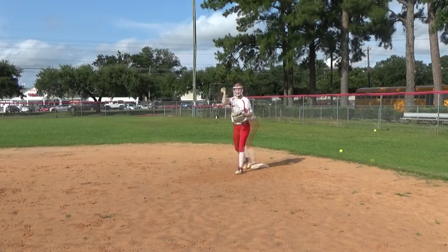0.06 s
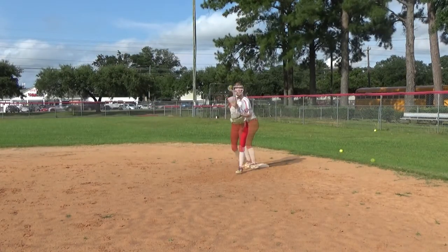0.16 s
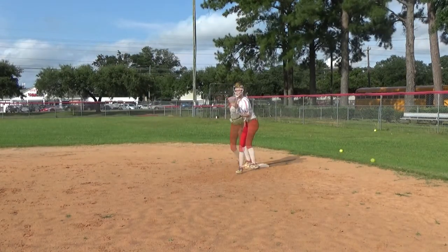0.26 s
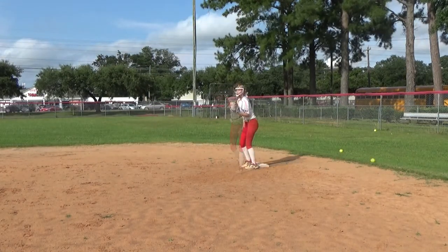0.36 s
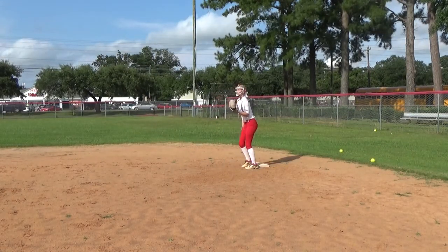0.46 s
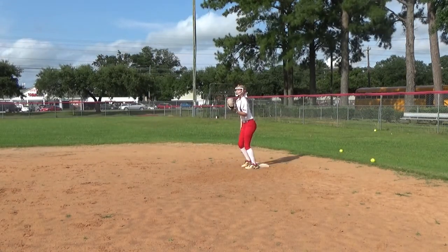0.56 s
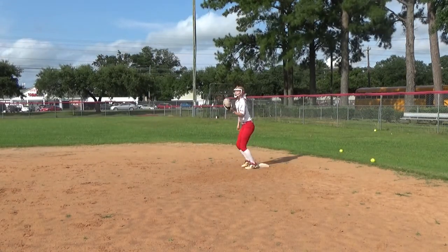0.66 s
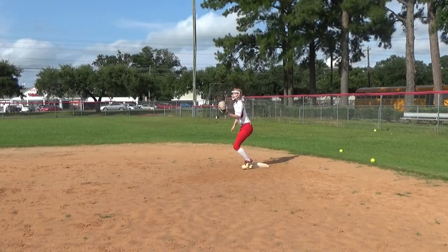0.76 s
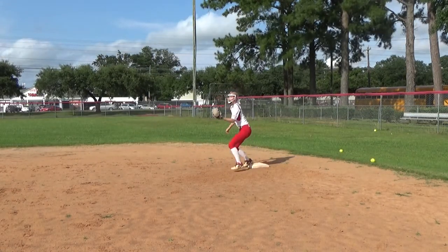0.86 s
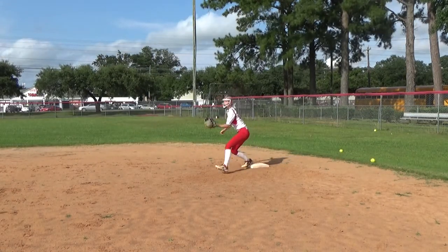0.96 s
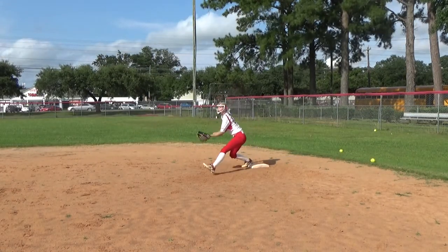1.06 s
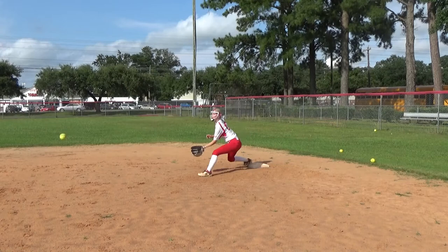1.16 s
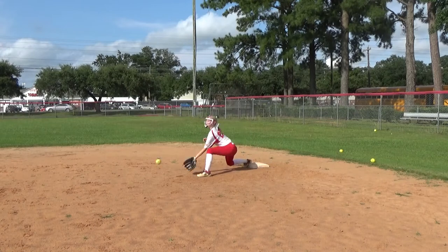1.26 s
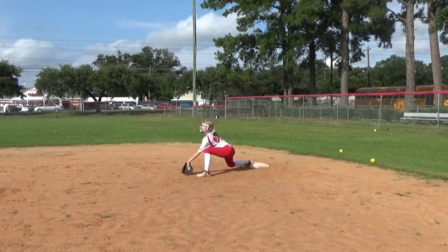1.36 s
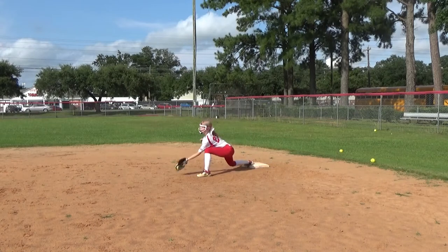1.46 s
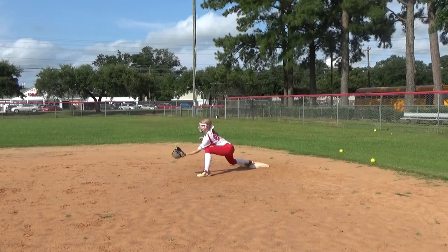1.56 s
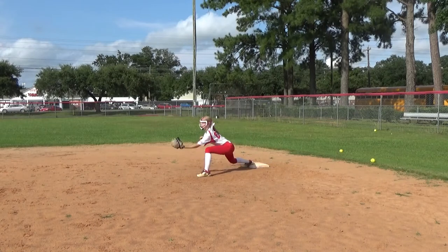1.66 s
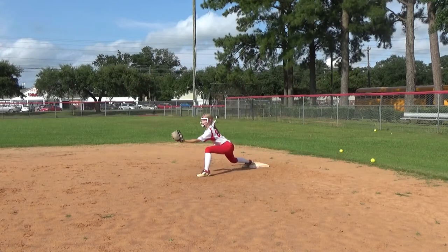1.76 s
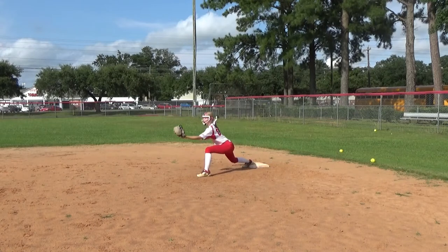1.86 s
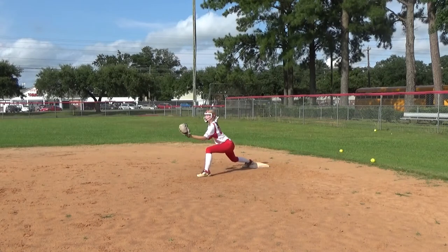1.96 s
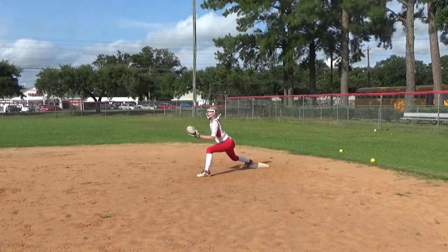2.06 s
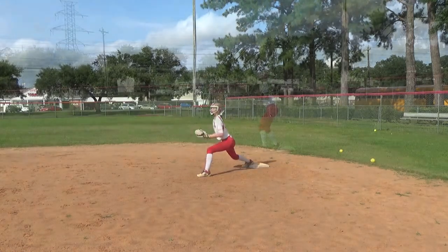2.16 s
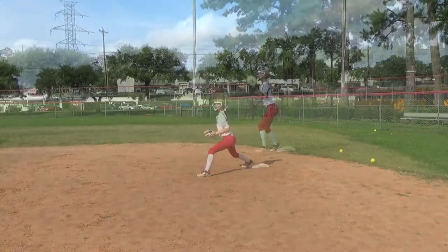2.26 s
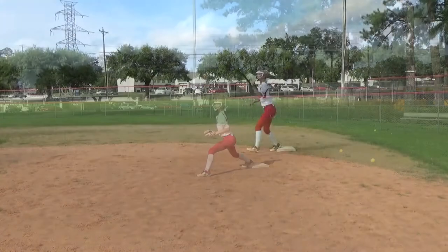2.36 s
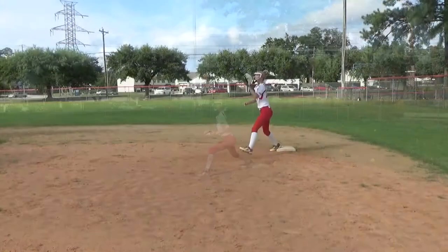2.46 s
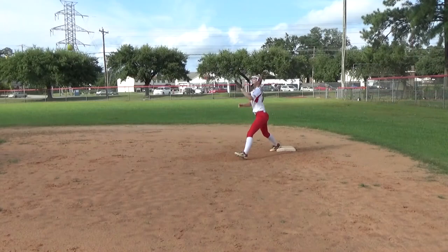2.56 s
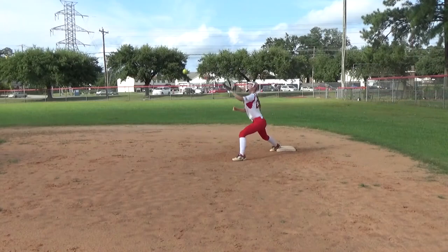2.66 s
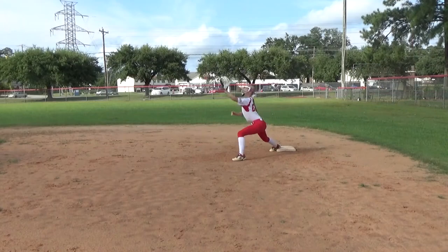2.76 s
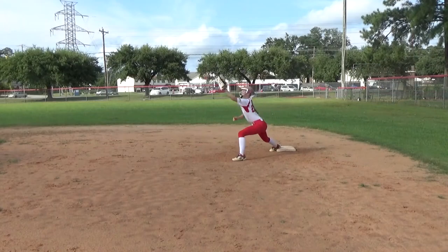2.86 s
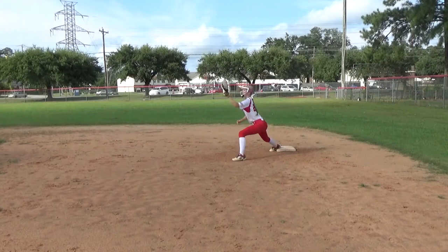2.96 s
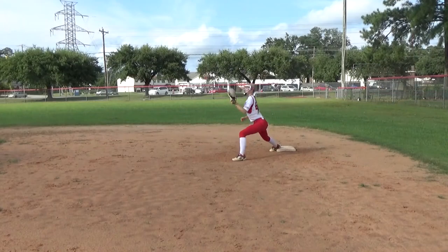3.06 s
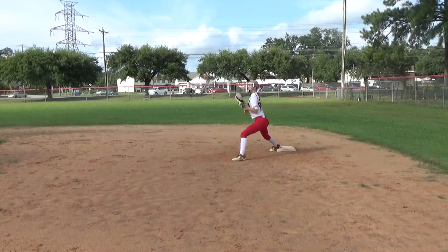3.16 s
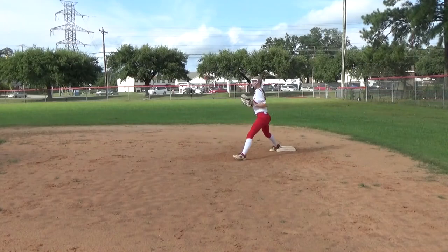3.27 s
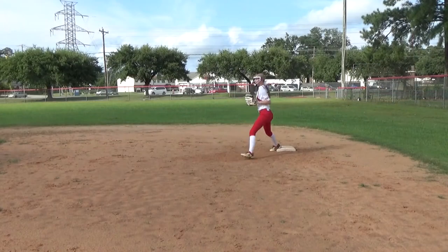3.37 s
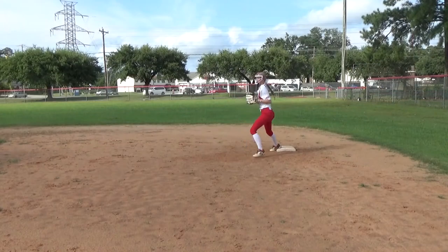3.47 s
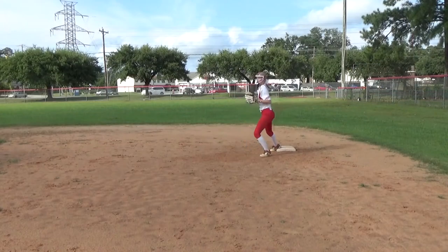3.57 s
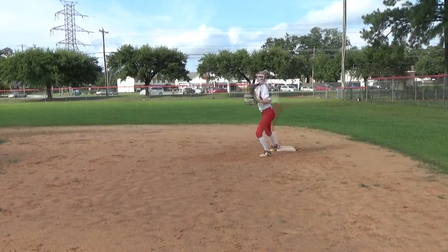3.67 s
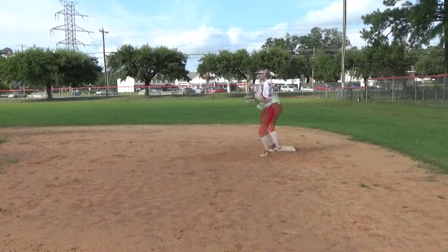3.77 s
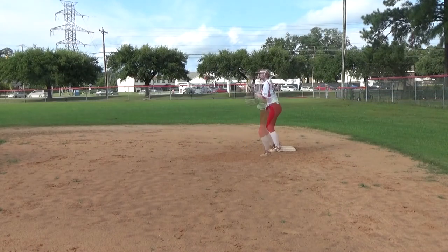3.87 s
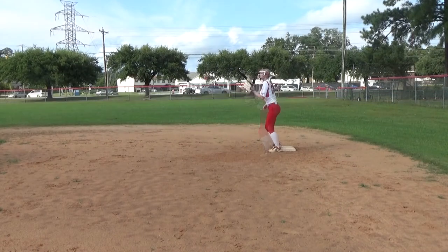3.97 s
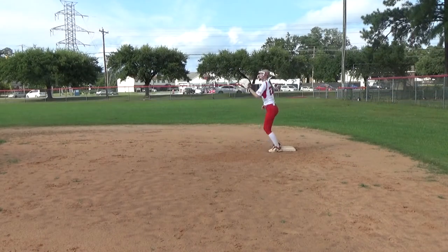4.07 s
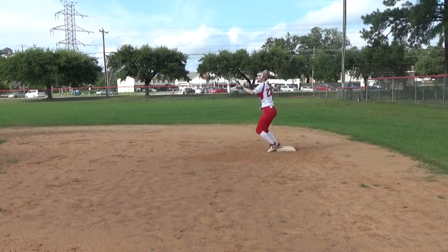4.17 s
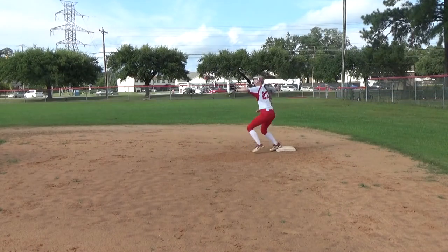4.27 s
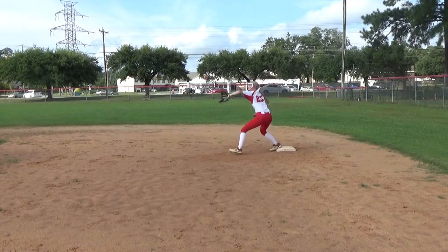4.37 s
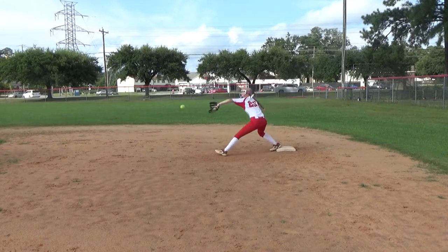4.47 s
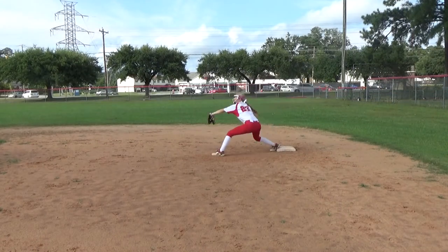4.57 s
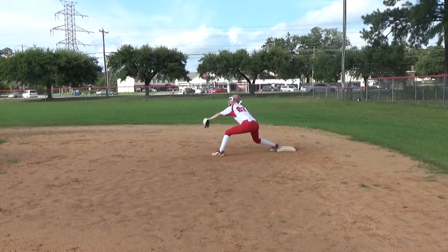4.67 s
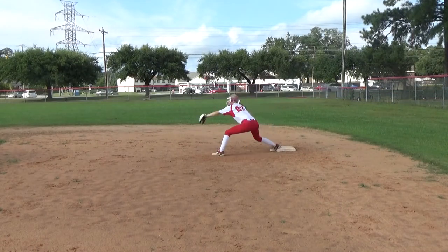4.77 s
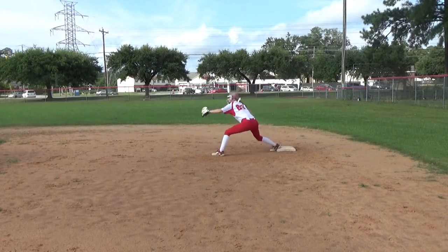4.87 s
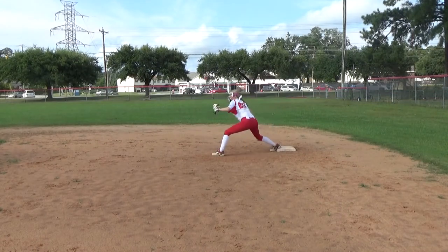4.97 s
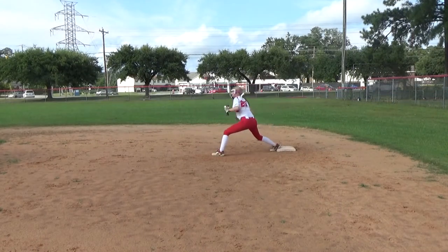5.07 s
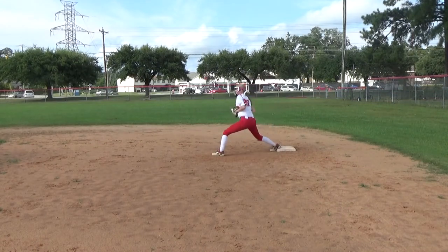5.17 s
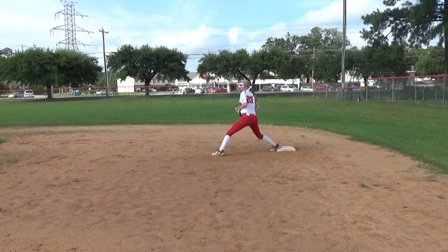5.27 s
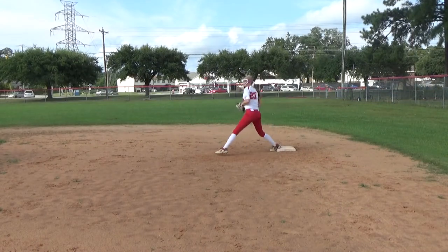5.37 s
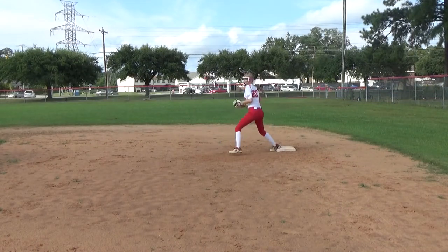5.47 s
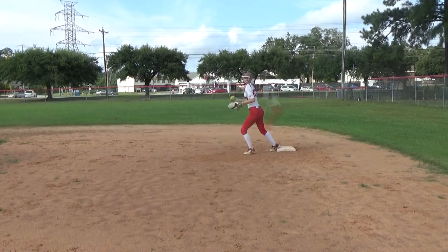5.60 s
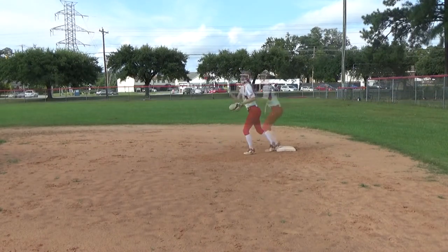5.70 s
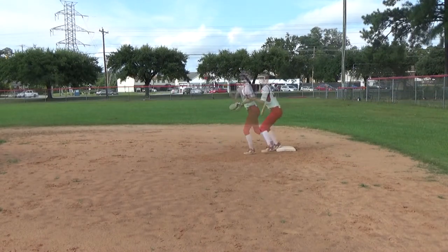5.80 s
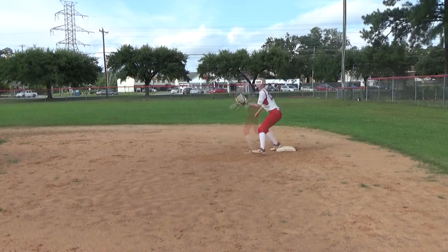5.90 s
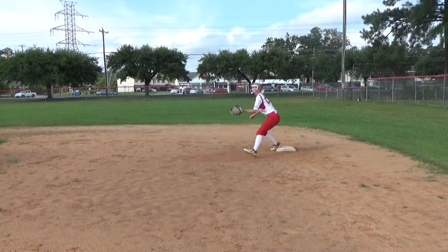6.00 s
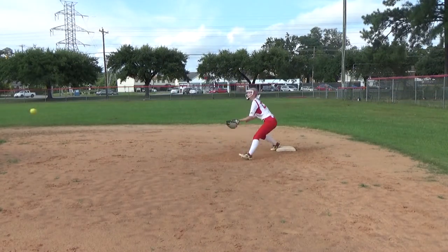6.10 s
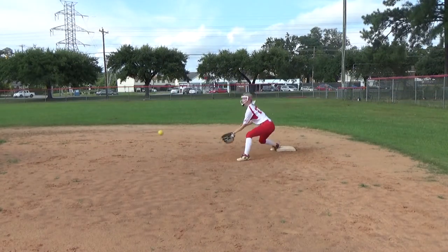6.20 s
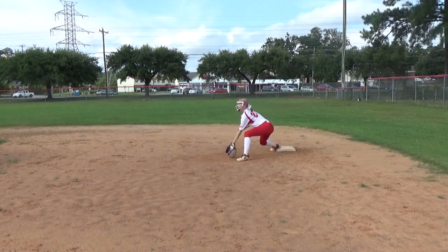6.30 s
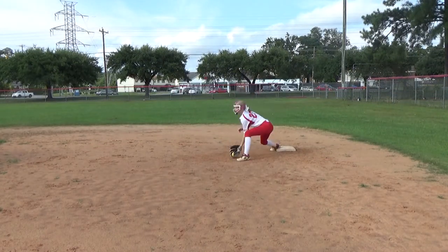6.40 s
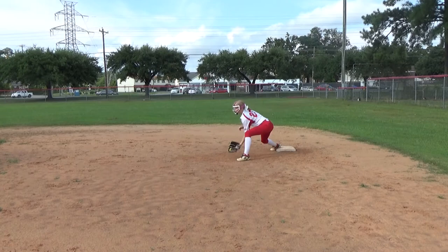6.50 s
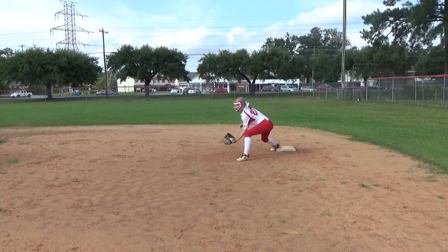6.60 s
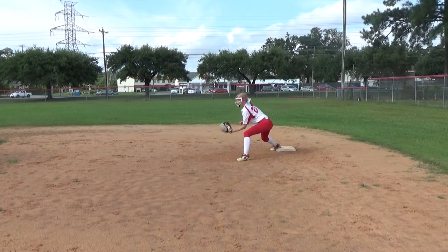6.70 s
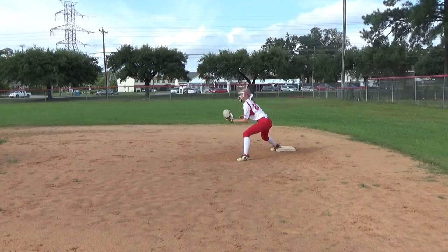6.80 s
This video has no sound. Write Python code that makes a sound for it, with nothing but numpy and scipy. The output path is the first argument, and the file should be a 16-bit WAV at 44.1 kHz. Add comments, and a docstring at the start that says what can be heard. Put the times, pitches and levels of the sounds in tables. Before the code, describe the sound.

A softball pops into a leather glove four times on an open dirt infield, at about 1.4, 2.8, 4.6 and 6.4 seconds. Each catch is a sharp slap with a short echo, just right of centre; the first is a little lighter and the third is a tighter, higher knock. Cleats tap, twist and skid on grit around the catches, with further steps near 3.5 and 5.7 seconds.

Low, lumpy wind gusts buffet the microphone from 0.3 to 3.9 seconds, fall away, then return more gently from about 5.5 seconds. A distant traffic hum continues underneath, with a faint low drone swelling near 2.3 and 5.6 seconds. Insects hiss thinly throughout, a quiet cricket trills from about 3 seconds, and a brighter insect buzz joins at 5.8 seconds. The sound drops out for an instant near 2.4 and 3.9 seconds.

```python
"""Four throws pop into a leather glove in a fielding drill on a dirt infield, each with a short echo.
The ball rings the damped pocket and slaps out a crack; cleats knock and scuff the grit around each catch.
Gusts buffet the microphone over a distant town hum and a low drone, while a cricket and other insects
sing in the grass with their wings. The sound drops out briefly twice."""
import sys
import numpy as np
from scipy import signal
from scipy.fft import rfft, irfft
from scipy.io import wavfile
from scipy.ndimage import uniform_filter1d

SR = 44100
rng = np.random.default_rng(int(sys.argv[2]) if len(sys.argv) > 2 else 0)


def file_out(sig):
    """Save sig as 16-bit WAV at sys.argv[1]."""
    # one column per channel
    cols = np.atleast_2d(sig).T
    # limit, then scale
    lim = np.clip(cols, -1, 1)
    pcm = np.round(lim * 32767).astype(np.int16)
    wavfile.write(sys.argv[1], SR, pcm)


N = 301718
TIME = np.arange(N) / SR

# Stereo image of the background. Each row: frequency in Hz, left-right likeness (capped in noise_pair).
AMBIENT_LIKENESS = [(60, 0.94), (300, 1), (1400, 0.74), (7000, 0.7), (13000, 1)]


def amp(db):
    """Decibels to gain."""
    return 10 ** (np.asarray(db) / 20)


def unit(x):
    """Scales to rms 1."""
    return x / np.sqrt(np.mean(x ** 2) + 1e-20)


def decay(t, t60_s):
    """Exponential fall, 60 dB in t60_s."""
    return np.exp(-np.log(1000) * t / t60_s)


def read(points, hz):
    """Reads a spectrum table on a log-frequency axis."""
    f, value = np.transpose(points)
    return np.interp(np.log(hz + 1), np.log(f + 1), value)


def follow(rows):
    """Reads a time curve at every sample."""
    return np.interp(TIME, *np.transpose(rows))


def add(mix, start_s, sound):
    """Mixes a sound in at start_s."""
    part = mix[round(start_s * SR):][:len(sound)]
    part += sound[:len(part)]


def wander(rate_hz):
    """Random motion of rms 1, up to about rate_hz."""
    hz = np.fft.rfftfreq(N, 1 / SR)
    return unit(irfft(rfft(rng.standard_normal(N)) / (1 + (hz / rate_hz) ** 4), N))


def colour(x, points, tilt_db_oct, size=1024):
    """Minimum-phase filter of unit energy with the given spectrum and treble tilt."""
    hz = abs(np.fft.fftfreq(size, 1 / SR))
    log_gain = np.log(amp(read(points, hz) + tilt_db_oct * np.log2(np.maximum(hz, SR / 64) / SR)))
    taps = np.fft.ifft(np.exp(np.conj(signal.hilbert(log_gain)))).real
    return signal.fftconvolve(x, taps / np.linalg.norm(taps))


def noise_pair(points, likeness=AMBIENT_LIKENESS):
    """Two partly alike channels of coloured noise, mid rms 1."""
    hz = np.fft.rfftfreq(N, 1 / SR)
    same = np.clip(read(likeness, hz), -0.9, 0.9)
    mid, side = rfft(rng.standard_normal((2, N))) * amp(read(points, hz))
    mid = irfft(mid, N)
    side = irfft(side * np.sqrt((1 - same) / (1 + same)), N)
    return np.array([mid + side, mid - side]) / mid.std()


def town(hum_gain_db=2, swell_db=0.5):
    """Far traffic and leaves under the thin high hiss of the verge."""
    # Spectra. Each row: frequency in Hz, relative level in dB.
    hum_spectrum = [(15, -64), (25, -45), (76, -1.5), (160, -1), (211, -13), (267, -4.5), (377, -5),
                    (793, 2.5), (1020, 1), (1120, 1), (1830, -2), (6400, -16.5), (8320, -24), (14100, -120)]
    hiss_spectrum = [(4500, -1), (6200, 0), (7800, 3.5), (8800, 0.5), (10500, 1.5), (12500, -6.5),
                     (16000, -11.5)]
    # Level curves. Each row: time in seconds, level in dB before gains.
    hum_levels = [(0, -46.5), (.48, -43.5), (1.39, -42.5), (2.4, -45.5), (2.7, -50.5), (3.7, -47),
                  (5.2, -47.5), (6.2, -50.5), (6.84, -48)]
    hiss_levels = [(0, -56.5), (1.2, -53.5), (1.8, -54), (2.5, -56.5), (4.3, -56.5), (5.4, -59.5),
                   (6.0, -57), (6.84, -54)]
    hum = noise_pair(hum_spectrum) * amp(follow(hum_levels) + hum_gain_db + swell_db * wander(14))
    return hum + noise_pair(hiss_spectrum) * amp(follow(hiss_levels))


def drone():
    """A far, narrow band of low noise swells and fades."""
    # Swell. Each row: time in seconds, level in dB.
    levels = [(0, -56.5), (1.9, -52), (2.32, -45), (2.6, -66), (4.4, -61.5), (4.7, -53.5), (5.3, -58),
              (5.65, -41.5), (5.87, -58), (6.84, -51)]
    band_hz_db = [(90, -17), (165, -5.5), (205, 3), (250, -6), (380, -45), (900, -90)]
    return noise_pair(band_hz_db) * amp(follow(levels))


def insects(waver_db=1.7, rate_jitter=0.063, fade_s=0.0063):
    """Each song is a narrow wing resonance, pulsed by the wing strokes."""
    # Each row: start and end in seconds, centre and width in Hz, level in dB, strokes per second,
    # stroke depth from 0 to 1.
    songs = [(0, 7, 7300, 235, -58.5, 36, 0.4), (0, 7, 6900, 360, -60.5, 16, 0.2),
             (.42, .82, 9100, 130, -65, 30, .2), (5.83, 7, 10100, 660, -53.5, 70, 0),
             (5.83, 7, 9570, 620, -57.5, 70, .15), (5.83, 7, 5160, 894, -60, 82, 0.1)]
    out = np.zeros((2, N))
    for start_s, end_s, hz, width_hz, db, stroke_hz, depth in songs:
        band = [(hz - 3 * width_hz, -70), (hz - width_hz, -13), (hz - width_hz / 3, 0),
                (hz + width_hz / 3, 0), (hz + width_hz, -17), (hz + 2 * width_hz, -70)]
        turns = np.cumsum(stroke_hz * (1 + rate_jitter * wander(5.3))) / SR
        strokes = unit(1 + depth * np.cos(2 * np.pi * turns))
        gate = np.clip(np.minimum(TIME - start_s, end_s - TIME) / fade_s, 0, 1)
        out += noise_pair(band) * strokes * amp(db + waver_db * wander(24)) * gate
    return out


def cricket(centre_hz=2760, stroke_hz=29.9, sag_hz=160, scatter_hz=70, waver_db=1.5):
    """One short note per wing stroke, sagging in pitch as the wing slows; the grass blurs it."""
    # Trill. Each row: time in seconds, level in dB.
    levels = [(0, -70), (1.5, -75), (2.5, -72), (3.1, -60), (4.3, -60), (4.95, -59), (5.4, -62),
              (5.9, -61.5), (6.84, -60)]
    stroke = (TIME * stroke_hz) % 1
    envelope = np.sin(np.pi * stroke) ** 4
    pitch_hz = centre_hz - sag_hz * (stroke - 0.5) + scatter_hz * wander(128)
    tone = np.sin(2 * np.pi * np.cumsum(pitch_hz) / SR)
    return unit(envelope * tone) * amp(follow(levels) + waver_db * wander(16))


def gusts(rise_s=0.017, fall_s=0.045, sag_db_per_s=8):
    """Wind level and brightness in dB: each gust rises fast, sags and drops back into the breeze."""
    # Breeze between gusts. Each row: time in seconds, level in dB.
    breeze = [(0, -63.5), (1.5, -52.5), (2.2, -48), (3.0, -45), (3.8, -46), (3.9, -74), (5.2, -59),
              (6.0, -49.5), (6.84, -44.5)]
    # Gusts. Each row: start and length in seconds, level and brightness in dB.
    bursts = [(0.289, 0.18, -30, 2), (0.452, .2, -34, 0), (0.631, 0.38, -28.5, 1.5),
              (1.002, 0.54, -35.5, -2.5), (1.138, 0.075, -30, 1.5), (1.847, 0.1, -33, -1),
              (1.922, .22, -39.5, -1), (2.023, 0.054, -31.5, -3), (2.278, 0.34, -37.5, -2.5),
              (2.452, 0.22, -29.5, 2), (2.569, .07, -27, 2.5), (2.652, 0.18, -30, 0.5),
              (2.959, 0.16, -34.5, 0), (3.232, 0.352, -33, -1.5), (3.611, 0.22, -38.5, -1),
              (3.774, 0.12, -32, 0), (5.244, 0.47, -53, -7), (5.545, 0.075, -37.5, -5),
              (5.6, 0.2, -36.5, -3), (6.143, .27, -39.5, -0.5), (6.446, 0.35, -37, 0.5)]
    power, weighted_bright = amp(follow(breeze)) ** 2, np.zeros(N)
    for start_s, length_s, db, bright_db in bursts:
        t = np.arange(0, length_s, 1 / SR)
        shape = np.minimum(t / rise_s, 1) * np.minimum((length_s - t) / fall_s, 1)
        gust_power = (shape * amp(db - sag_db_per_s * t)) ** 2
        add(power, start_s, gust_power)
        add(weighted_bright, start_s, gust_power * bright_db)
    return 10 * np.log10(power), weighted_bright / power


def wind(lump_db=2, lump_hz=32, split_hz=280, strong_db=-33, tilt_per_db=0.25, likeness=0.9):
    """Eddies hit the microphone in lumps; stronger gusts move their weight up in pitch."""
    # Buffeting. Each row: frequency in Hz, relative level in dB.
    spectrum = [(25, -40), (60, -17.5), (110, -6.5), (200, 0), (330, 1), (480, -3.5), (700, -7.5),
                (1000, -16.5), (2000, -31.5), (4500, -47), (9000, -61), (16000, -81)]
    # The air reaches the left port first. Each row: frequency in Hz, phase lead in radians.
    port_lead = [(20, .3), (60, 0.32), (120, 0.49), (220, 0.96), (420, 1.27), (800, 1.82), (1500, 1.04),
                 (4000, 1.3)]
    level_db, bright_db = gusts()
    level_db += lump_db * wander(lump_hz)
    lead_rad = read(port_lead, np.fft.rfftfreq(N, 1 / SR))
    air = noise_pair(spectrum, [(1, likeness)])
    air = irfft(rfft(air) * np.exp(0.5j * np.array([lead_rad, -lead_rad])), N)
    air /= air.mean(0).std()
    low = signal.sosfiltfilt(signal.butter(2, split_hz, fs=SR, output="sos"), air)
    tilt_db = tilt_per_db * np.clip(level_db - strong_db, -18, 4) + bright_db
    return amp(level_db) * (low * amp(-tilt_db) + (air - low) * amp(tilt_db))


def field(x, near_db=-15, near_t60_s=0.019, far_db=-21, far_t60_s=0.92, echoes_per_s=2000):
    """The ground scatters a little at once; fence and trees return a faint, dull tail."""
    t = np.arange(SR) / SR
    near, mid, side = rng.standard_normal((3, SR)) * (rng.random((3, SR)) < echoes_per_s / SR)
    near = signal.lfilter(*signal.butter(1, 4000, fs=SR), near * decay(t, near_t60_s))
    far = np.array([mid + side / 2, mid - side / 2]) * decay(t, far_t60_s) * np.minimum(t / 0.014, 1)
    far = signal.lfilter(*signal.butter(2, 2200, fs=SR), far)
    taps = amp(near_db) * np.array([near, -near]) / np.linalg.norm(near)
    taps += amp(far_db) * far / np.linalg.norm(far[0])
    return x + signal.fftconvolve(x[None], taps, axes=1)[:, :N]


def sliding_sole(strokes, peak_at, grains_per_s=15000, spread_db=5):
    """A sole crushes a stream of sand grains, pressing hardest at the share peak_at of each stroke."""
    # Grit. Each row: frequency in Hz, relative level in dB.
    spectrum = [(150, -12), (500, -1), (1000, -1), (1700, 3), (3000, -5), (4500, -7), (7000, -9),
                (8500, -11), (10500, -11), (13000, -20), (16000, -30)]
    out = np.zeros(N)
    sizes = amp(spread_db * np.minimum(rng.exponential(1, N), 5)) * rng.choice([-1., 1.], N)
    grains = unit(sizes * (rng.random(N) < grains_per_s / SR))
    for start_s, length_s, db, tilt_db_oct in strokes:
        stroke = grains[round(start_s * SR):][:round(length_s * SR)]
        pressure = np.interp(np.linspace(0, 1, len(stroke)), [0, peak_at, 1], [0, 1, 0]) ** 0.64
        add(out, start_s, amp(db) * colour(stroke * pressure, spectrum, tilt_db_oct))
    return out


def scuffs():
    """Soles twist or drag on grit; the lunging foot skids to rest after a catch."""
    # Each row: start and length in seconds, level in dB, treble tilt in dB per octave.
    twists = [(1.243, .047, -29.5, -2.5), (1.289, 0.069, -33, -1.5), (1.64, 0.029, -36, -2.5),
              (2.205, .058, -46.5, 2.5), (2.702, 0.039, -26, -1), (2.733, .038, -29, 1.5),
              (2.776, 0.045, -40.5, 2), (3.422, .05, -33.5, 1), (3.465, 0.048, -29, .5),
              (3.648, 0.047, -35, -0.5), (3.712, 0.025, -37, -3.5), (3.905, 0.066, -46.5, 4),
              (4.579, 0.036, -36.5, -1.5), (4.61, 0.041, -31.5, -4), (5.687, 0.076, -36.5, -2.5),
              (6.228, 0.032, -32.5, -2), (6.255, .045, -29, 0), (6.315, 0.055, -32.5, 0)]
    skids = [(1.453, 0.14, -38, 5.5), (4.655, .24, -37.5, 0), (6.470, 0.21, -43, -0.5)]
    return sliding_sole(twists, peak_at=0.35) + sliding_sole(skids, peak_at=0.039)


def contact(thump_db, body_hz, body_t60_s, crack_db, crack_t60_s, tilt_db_oct,
            thump_rise_s=0.0004, crack_rise_s=0.00028):
    """One contact rings a damped body and throws off a tick and a short crack."""
    # Pocket modes, a heavily damped cup. Each row: ratio to body_hz, level in dB, share of body_t60_s.
    pocket_modes = [(0.491, -21.5, 1.0), (1, 3.5, 0.99), (1.199, -2, 0.96), (1.92, -7, 0.55),
                    (3.299, -18.5, 0.53)]
    # Brief high tones that colour the crack. Each row: frequency in Hz, level in dB,
    # t60 in seconds before damping.
    crack_tones = [(1499, -15, 0.044), (2630, -27, 0.048), (3770, -12.5, 0.022), (4790, -22, 0.031),
                   (5780, -15, 0.022), (6950, -50, 0.015), (9350, -23, 0.022)]
    # Crack. Each row: frequency in Hz, relative level in dB.
    spectrum = [(150, -14), (500, -9.5), (1400, 6), (2400, 0.5), (3200, -3.5), (4300, -3), (6500, -8.5),
                (8300, -12), (10000, -10), (13000, -21), (16000, -40)]
    t = np.arange(SR // 10) / SR
    thump = sum(amp(db) * decay(t, body_t60_s * share) * np.sin(2 * np.pi * body_hz * ratio * t)
                for ratio, db, share in pocket_modes)
    ring = sum(amp(db) * decay(t, t60_s) * np.sin(2 * np.pi * hz * t) for hz, db, t60_s in crack_tones)
    damping = np.exp(-t / crack_t60_s)  # brief contacts ring less
    slap = rng.choice([-1., 1.], len(t)) * decay(t, crack_t60_s) * (1 - np.exp(-t / crack_rise_s))
    slap[0] = amp(3)  # tick of the first touch
    out = amp(thump_db) * thump * (1 - np.exp(-t / thump_rise_s))
    out += amp(crack_db) * colour(slap, spectrum, tilt_db_oct)[:len(t)]
    out += amp(crack_db + tilt_db_oct) * ring * damping
    highpass = signal.butter(2, 150, "high", fs=SR, output="sos")  # the contact carries no deep bass
    return signal.sosfilt(highpass, out)


def knocks(knock_t60_s=0.021, click_t60_s=0.009):
    """Short dull knocks: cleats on dirt and late echoes of the catches."""
    # Each row: start in seconds, knock level in dB, knock pitch in Hz, click level in dB.
    events = [(1.2638, -22, 1120, -33), (1.2700, -24, 1790, -37.5), (1.279, -24, 1690, -40),
              (1.384, -36, 1320, -25.5), (1.6396, -25, 1370, -31), (2.669, -20, 287, -31),
              (3.4693, -30, 1480, -22), (3.720, -45, 1380, -30), (4.793, -26, 943, -36),
              (4.863, -44.5, 1110, -31), (5.763, -27.5, 1110, -34), (5.7745, -29, 1660, -31),
              (6.239, -21.5, 1210, -33)]
    out = np.zeros(N)
    for start_s, knock_db, hz, click_db in events:
        add(out, start_s, contact(knock_db, hz, knock_t60_s, click_db, click_t60_s, tilt_db_oct=-1.5))
    return out


def catches(rebound_s=0.02, rebound_t60_s=0.022, echo_cutoff_hz=5500, scatter_s=0.012, scatter_db=-9):
    """The ball slaps the glove, seats and rebounds; a wall echoes the pop, a nearer fence scatters it."""
    # Each row: start in seconds, pocket pitch in Hz, pocket t60 in seconds, thump and crack in dB,
    # crack t60 and seating delay in seconds, seating and rebound in dB, echo delay in seconds, echo in dB.
    throws = [(1.4462, 757, 0.024, -28, -14, 0.031, .0026, -14, -24, .069, -20),
              (2.838, 758, 0.021, -16, -10.5, 0.03, 0.0082, -11.5, -21, .0562, -12),
              (4.6385, 1100, 0.011, -8, -17, 0.014, .006, -27, -38, .055, -4.5),
              (6.4097, 720, 0.014, -13.5, -11.5, 0.016, .0052, -23, -45, 0.055, -8)]
    out = np.zeros(N)
    for (start_s, hz, t60_s, thump_db, crack_db, crack_t60_s,
         seat_s, seat_db, rebound_db, echo_s, echo_db) in throws:
        pop = contact(thump_db, hz, t60_s, crack_db, crack_t60_s, tilt_db_oct=2.1)
        seat = contact(seat_db, hz, t60_s, seat_db - 5, crack_t60_s, tilt_db_oct=0.2)
        rebound = contact(rebound_db - 5, hz, t60_s, rebound_db, rebound_t60_s, tilt_db_oct=1.5)
        add(pop, seat_s, seat)
        add(pop, rebound_s, rebound)
        echo = amp(echo_db) * signal.lfilter(*signal.butter(1, echo_cutoff_hz, fs=SR), pop)
        fence = rng.standard_normal(len(pop))[:round(scatter_s * SR)]
        scatter = amp(scatter_db) * signal.fftconvolve(echo, fence / np.linalg.norm(fence))
        add(out, start_s, pop)
        add(out, start_s + echo_s, echo)
        add(out, start_s + echo_s - scatter_s, scatter)
    return out


def scene():
    """The player just right of centre, in the open air."""
    player = field(knocks() + scuffs() + catches()) * amp([[-0.3], [0.3]])
    return player + wind() + town() * amp([[-0.4], [0.4]]) + drone() + insects() + cricket()


def record(dry, dropout_db=-33.5, cutoff_hz=15900):
    """Two short dropouts, then the band limit."""
    # Each row: start and end in seconds.
    dropouts = [(2.360, 2.372), (3.862, 3.886)]
    gain = np.ones(N)
    for start_s, end_s in dropouts:
        gain[(TIME > start_s) & (TIME < end_s)] = amp(dropout_db)
    lowpass = signal.firwin(511, cutoff_hz, window=("kaiser", 9), fs=SR)
    return signal.oaconvolve(dry * uniform_filter1d(gain, size=48), lowpass[None], "same")


dry = scene()
out = record(dry)
file_out(out)
```